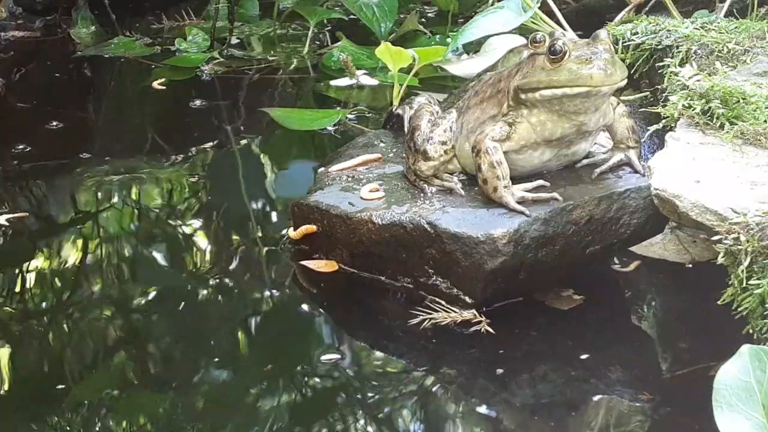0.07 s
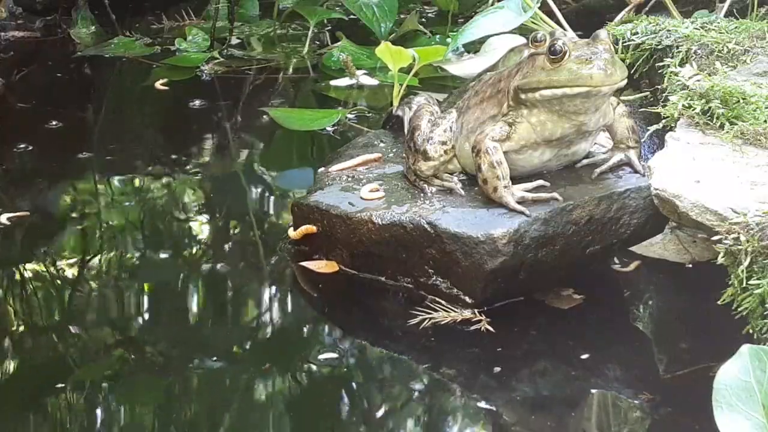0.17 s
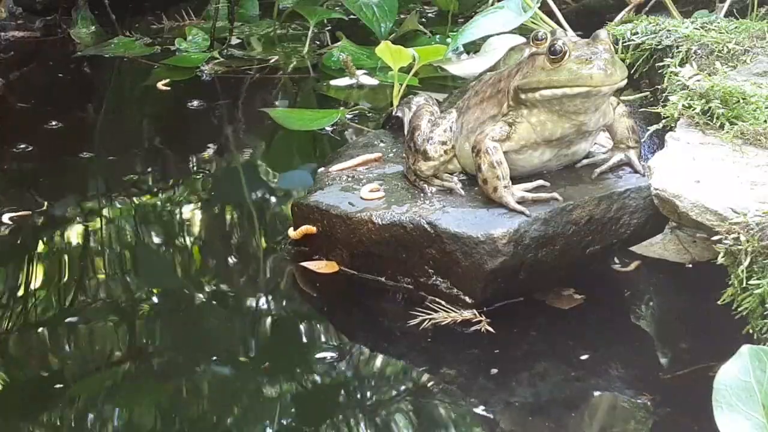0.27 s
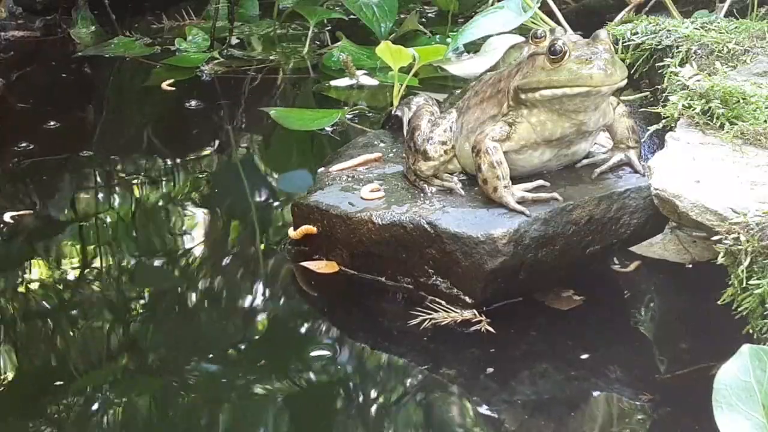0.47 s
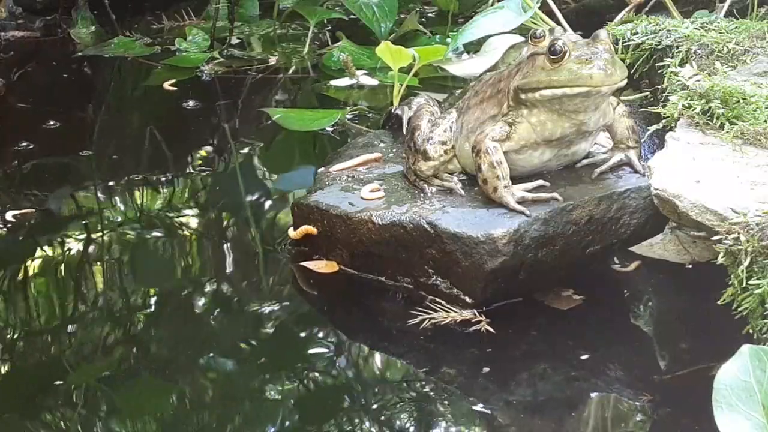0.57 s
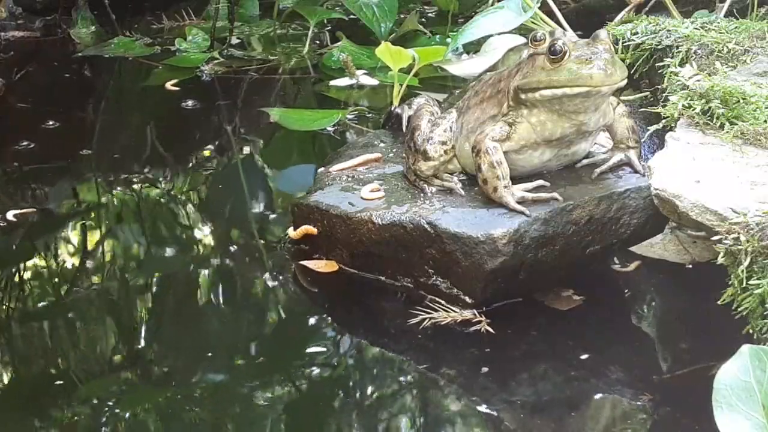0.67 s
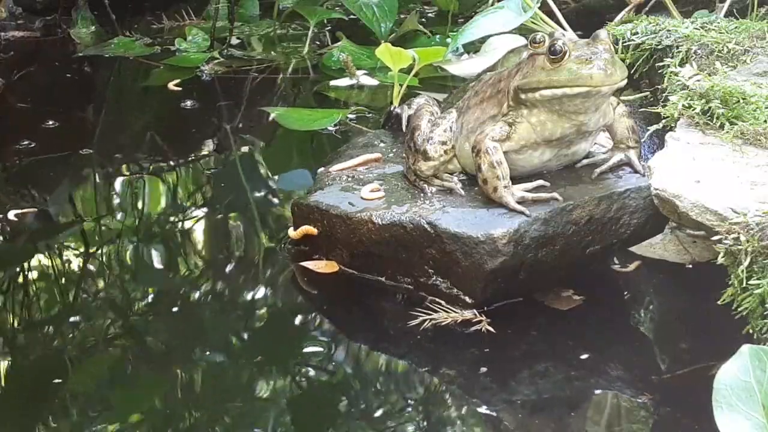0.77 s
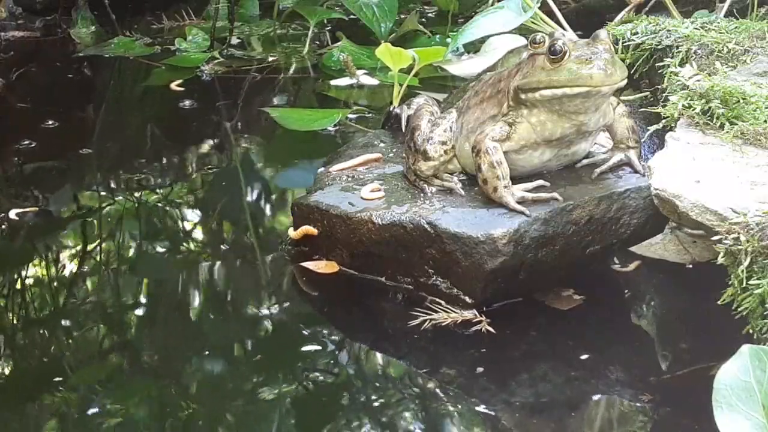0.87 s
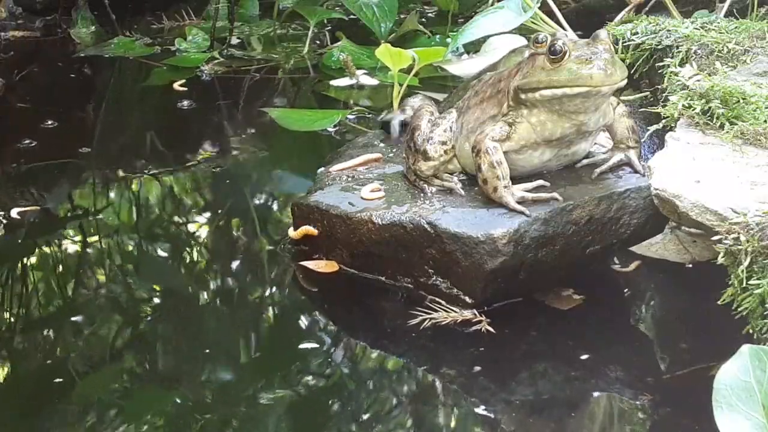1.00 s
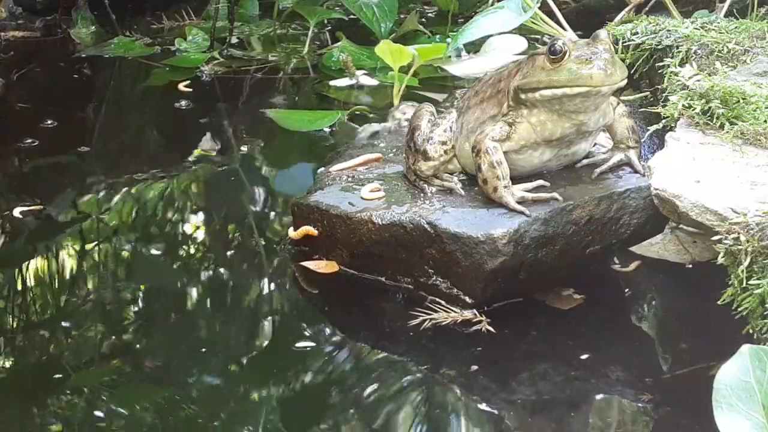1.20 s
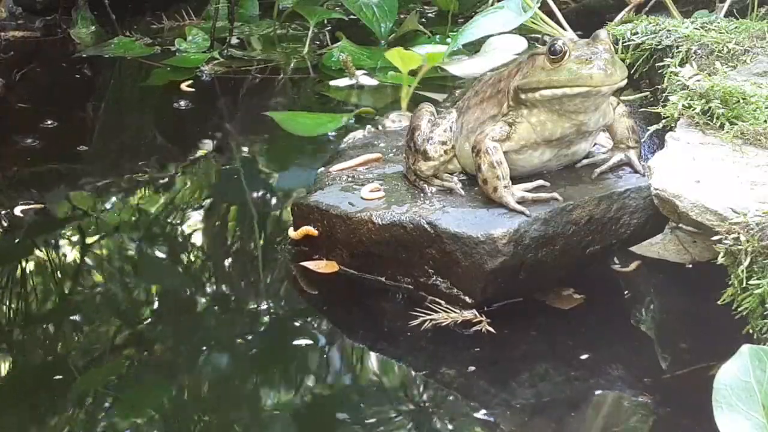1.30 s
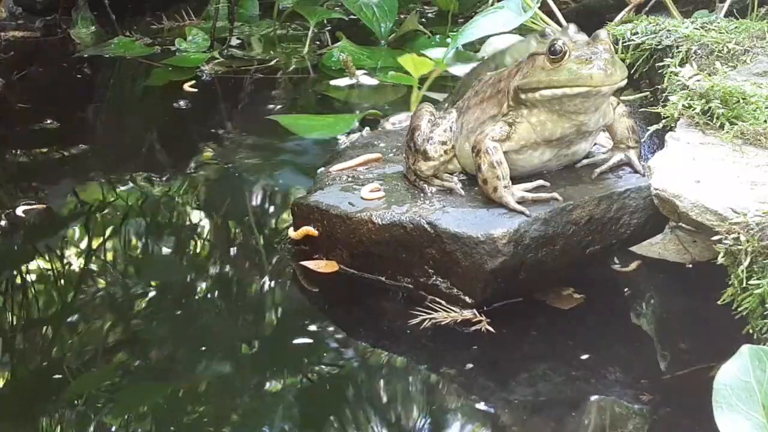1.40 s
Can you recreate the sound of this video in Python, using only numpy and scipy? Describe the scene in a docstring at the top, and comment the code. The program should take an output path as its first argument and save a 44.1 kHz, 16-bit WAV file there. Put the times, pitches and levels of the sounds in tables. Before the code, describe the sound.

A bullfrog gives one low bellow beside a quiet pond.

```python
"""Bullfrog on a pond rock

A little left of the stereo microphone, a bullfrog gives one low bellow: throat pulses that swell and
fade, limping in threes as a growl, then settling into a cleaner, lower note. A soft low hum leads in,
probably the sac filling; the banks answer briefly and a falling hum follows. Behind are a quiet
outdoor rush, a thin, distant trill, faint higher whirs and two tiny ticks."""
import sys
import numpy as np
from scipy import signal
from scipy.fft import rfft, irfft, next_fast_len
from scipy.io import wavfile
from scipy.ndimage import map_coordinates

SR = 44100
rng = np.random.default_rng(int(sys.argv[2]) if len(sys.argv) > 2 else 0)


def master(y):
    """Save y as 16-bit WAV."""
    cut = np.clip(np.atleast_2d(y).T, -1, 1)
    pcm = np.round(cut * 32767)  # scale
    wavfile.write(sys.argv[1], SR, pcm.astype(np.int16))


N = 63945

# likeness of the noise at the two sides of the microphone (frequency [Hz], correlation [0-1])
LIKENESS = [(60, 1), (300, 0.7), (900, 0.11), (1500, 0), (3000, 0), (15000, 0)]
# low rumble around the pond (frequency [Hz], relative level [dB])
RUMBLE_SPECTRUM = [(5, -59.5), (20, -38), (40, -13), (60, -2), (90, -1), (125, 0), (170, -6.5), (250, -5.5),
                   (400, -47.5), (800, -22), (4000, -95)]
# rush of the open air (frequency [Hz], relative level [dB])
AIR_SPECTRUM = [(20, -58), (100, -3), (300, -3.5), (600, -3.5), (900, 2), (1250, -2), (1900, -13.5),
                (3000, -21), (4200, -16.5), (5300, -26), (7500, -28.5), (10000, -30), (12000, -22.5),
                (15700, -24.5)]
# lean of rumble and rush (frequency [Hz], left boost and right cut [dB])
OUTDOOR_PAN = [(100, 1), (300, -0.5), (600, -.8), (1000, -3.1), (2500, 1.5), (6000, -1), (12000, -1.1)]
# the distant trill (time [s], whistle level [dB], hiss level [dB])
TRILL_LEVELS = [(0, -69, -66.5), (.2, -74, -88.5), (.29, -70, -71), (.36, -56, -58.5), (.4, -67, -59),
                (.443, -49, -63), (.48, -58.5, -57.5), (.59, -58.5, -60.5), (.645, -56, -60.5),
                (.74, -59.5, -59.5), (.83, -67.5, -63.5), (1, -67, -68), (1.1, -78.5, -66.5),
                (1.25, -76.5, -65.5), (1.45, -85, -69)]
# faint high whirs and, at 254 Hz, a soft low hum before the call, probably the sac filling
# (peak time [s], half-length [s], centre [Hz], half-width [Hz], level [dB])
WHIRS_AND_SAC_HUM = [(.04, .1, 7800, 221, -68), (0.069, 0.35, 2140, 28.8, -66.5),
                     (0.088, 0.072, 254, 21.2, -54), (0.255, 0.044, 5510, 540, -58.5),
                     (0.325, 0.097, 5620, 905, -58), (.01, .05, 6360, 800, -64.5),
                     (.58, 0.076, 8600, 90, -76.5), (.92, 0.17, 6200, 500, -75.5),
                     (1.36, .04, 1120, 463, -60)]
# beat of the frog's vocal cords (time [s], pulse rate [Hz])
PULSE_RATE = [(.1, 126.2), (.21, 119.8), (.3, 120.3), (.33, 119.1), (.39, 114.9), (.45, 112.5), (.5, 112),
              (.58, 110.3)]
# the growl (time [s], depth of the limp [0-1])
GROWL_DEPTH = [(.1, 1), (.27, 1), (.33, 0.5), (.365, 0.45), (.4, 0.14), (.55, 0.52)]
# effort of the bellow (time [s], level [dB])
EFFORT_LEVEL = [(.04, -59.5), (.11, -54), (.17, -43.5), (.245, -33), (.32, -26.5), (.38, -24), (.44, -30),
                (.528, -38), (.555, -46), (.58, -54), (.6, -53.5)]
# brightness of the voice (time [s], gain of the upper formant [dB])
BRIGHTNESS = [(.15, -33), (.22, -5), (.28, 4.5), (.335, 1.5), (.375, 0), (.41, 1.5), (.47, -5), (.55, -8.5)]
# throat and vocal sac while swelling (frequency [Hz], relative level [dB])
SAC_SWELLING = [(30, -85), (120, -44.5), (250, -14), (310, -6), (362, 1.5), (420, 0.5), (482, 5.5),
                (540, -1), (602, 5.5), (730, -2), (900, 3.5), (1000, -14.5), (1170, -12), (1340, -14),
                (1510, -4), (1700, -18), (1830, -31), (2350, -32.5), (3200, -56), (5000, -60.5)]
# throat and sac when taut (frequency [Hz], relative level [dB])
SAC_TAUT = [(30, -56), (120, -36), (240, -41), (350, -4), (470, 5), (590, 2), (700, -6), (810, -8.5),
            (930, 2), (1050, -39), (1150, -3.5), (1290, -21), (1420, -13.5), (1540, 2), (1640, -12),
            (1740, -14), (1850, -27), (2020, -28.5), (2200, -38.5), (2370, -23.5), (2560, -42.5),
            (2790, -23.5), (3050, -52), (5000, -69)]
# throat and sac while easing off (frequency [Hz], relative level [dB])
SAC_EASING = [(30, -49.5), (120, -36), (230, -25.5), (280, -45), (340, -9), (400, -15), (455, 1.5),
              (510, -6), (570, -7.5), (680, -8.5), (745, -16.5), (795, -18), (850, -15), (905, -5),
              (965, -27.5), (1020, -19.5), (1140, -14), (1360, -22), (1580, -16), (1700, -42), (1850, -35),
              (2000, -24), (2200, -62), (2380, -34), (2550, -51), (3200, -54), (5000, -64)]
# the frog's place, left of centre (frequency [Hz], left boost and right cut [dB])
ROCK_PAN = [(300, 1.63), (1000, 2.2), (2500, 1.7)]
# breathy part of the bellow (frequency [Hz], relative level [dB])
RASP_SPECTRUM = [(30, -52), (300, 2), (600, 6.5), (1500, -3.5), (2100, -14.5), (4000, -20.5), (5500, -14.5),
                 (7000, -19), (9000, -25.5), (15500, -28.5)]
# decay of the banks' answer (frequency [Hz], time to fall 60 dB [s])
BANK_DECAY = [(200, 0.089), (1000, .15), (3000, 0.17), (10000, 0.18)]
# strength of that answer at the microphone (frequency [Hz], gain [dB])
BANK_GAIN = [(200, -36), (500, -28), (1000, -5), (1600, -10.5), (2400, -4), (5000, 1)]
# the hum after the call (time [s], pitch [Hz], level [dB])
HUM_GLIDE = [(.53, 340, -88), (.6, 323.8, -57.5), (.645, 293.5, -48), (.7, 273.2, -57), (.74, 254, -49),
             (.78, 242, -59), (.85, 241, -100)]
# colour of the ticks (frequency [Hz], relative level [dB])
TICK_SPECTRUM = [(1000, -30), (4000, -3), (7500, 0.5), (11000, -13), (15500, 0)]
# the two ticks (time [s], level [dB])
TICK_ONSETS = [(1.346, -58.5), (1.378, -60)]

CREST_S = 0.3798  # the pulse at the peak of the frog's effort


def amp(db):
    """Decibels to gain."""
    return 10 ** (np.asarray(db) / 20)


def unit(x):
    """Scale to rms 1."""
    return x / np.sqrt(np.mean(x ** 2) + 1e-20)


def along(points, hz):
    """(Hz, value) points read on a log axis."""
    freqs, values = np.transpose(points)
    return np.interp(np.log(hz + 1), np.log(freqs + 1), values)


def clock():
    """Time of each sample in seconds."""
    return np.arange(N) / SR


def curves(rows):
    """One value per sample for each column after the time."""
    times, *columns = np.transpose(rows)
    return [np.interp(clock(), times, column) for column in columns]


def wobble(rate):
    """A smooth random curve, rate knots a second."""
    return map_coordinates(rng.standard_normal(N // 100), [clock() * rate + 2])


def filtered(x, response):
    """Pass x through a response given as a function of frequency."""
    size = 2 * next_fast_len(N)
    return irfft(rfft(x, size) * response(np.fft.rfftfreq(size, 1 / SR)), size)[..., :N]


def ringing(points, hz):
    """Minimum-phase response with the given (Hz, dB) shape: it rings only after a pulse."""
    cepstrum = irfft(np.log(amp(along(points, hz))))
    causal = np.concatenate([cepstrum[:1], 2 * cepstrum[1:len(cepstrum) // 2]])
    return np.exp(rfft(causal, len(cepstrum)))


def rush(gain):
    """Stereo noise of rms 1, alike in the bass and diffuse in the treble."""
    def mid_side(hz):
        angle = np.arccos(np.clip(along(LIKENESS, hz), -1, 1)) / 2
        return gain(hz) * np.array([np.cos(angle), np.sin(angle)])
    mid, side = filtered(rng.standard_normal((2, N)), mid_side)
    return unit(np.array([mid + side, mid - side]))


def narrow(centre_hz, half_width_hz):
    """Stereo noise in one resonance."""
    return rush(lambda hz: np.minimum(hz / centre_hz, 1) / (1 + ((hz - centre_hz) / half_width_hz) ** 2))


def outdoors(rumble_db=-56.5, air_db=-54.5):
    """All around the microphone, a low rumble under a steady, airy rush."""
    rumble = amp(rumble_db) * rush(lambda hz: amp(along(RUMBLE_SPECTRUM, hz)))
    air = amp(air_db + 0.36 * wobble(8.48)) * rush(lambda hz: amp(along(AIR_SPECTRUM, hz)))
    return filtered(rumble + air, lambda hz: amp(np.outer([1, -1], along(OUTDOOR_PAN, hz))))


def trill(flutter_db=2.5):
    """From far off, a thin, fluttering whistle in a band of hiss, perhaps an insect or a bird."""
    whistle_db, hiss_db = curves(TRILL_LEVELS)
    flutter = amp(flutter_db * wobble(79.46))
    whistle = unit(flutter * narrow(centre_hz=3964, half_width_hz=65))
    hiss = narrow(centre_hz=3960, half_width_hz=790)
    return amp(whistle_db) * whistle + amp(hiss_db) * hiss


def whirs_and_sac_hum():
    """Faint high whirs come and go; a soft low hum before the call is probably the sac filling."""
    return sum(amp(db) * np.exp(-((clock() - peak_s) / half_s) ** 2) * narrow(hz, half_hz)
               for peak_s, half_s, hz, half_hz, db in WHIRS_AND_SAC_HUM)


def cord_cycles():
    """Cycles of the vocal cords, counted from the crest of the call."""
    cycles = np.cumsum(curves(PULSE_RATE)[0]) / SR
    return cycles - np.interp(CREST_S, clock(), cycles)


def pulses(limp_s=0.00029, limp_size=0.033, jitter_s=0.00003, scatter_db=0.5):
    """One pulse per cycle of the vocal cords; in the growl they come early and late by turns."""
    cycle = np.arange(-40, 26)
    due_s = np.interp(cycle, cord_cycles(), clock())
    growl = np.interp(due_s, *np.transpose(GROWL_DEPTH))
    limp = 2 * np.pi * (0.32 * cycle + 0.471)  # one turn in about three pulses
    jitter, scatter = rng.standard_normal((len(cycle), 2)).T
    position = SR * (due_s + growl * (limp_s * np.cos(limp) + jitter_s * jitter))
    size = (1 + limp_size * growl * np.sin(limp)) * amp(scatter_db * scatter)
    taps = position.astype(int)[:, None] + np.arange(-7, 9)
    offset = taps - position[:, None]
    shape = np.sinc(offset) * np.sinc(offset / 8)  # lets a pulse fall between samples
    return np.bincount(np.clip(taps, 0, N - 1).ravel(), (size[:, None] * shape).ravel(), N)


def ramp(middle_s, length_s):
    """A straight rise from 0 to 1."""
    return np.clip((clock() - middle_s) / length_s + .5, 0, 1)


def bellow(upper_formant_edge_hz=1290):
    """The pulses ring the frog's throat, whose resonances shift as the sac tightens and eases."""
    train = pulses()
    (effort_db,), (bright_db,) = curves(EFFORT_LEVEL), curves(BRIGHTNESS)
    call_s = train.sum() / np.mean(curves(PULSE_RATE))
    scale = np.sqrt(call_s * SR / N)  # rms near 1 while the call lasts
    swelling, taut, easing = [scale * unit(filtered(train, lambda hz: ringing(sac, hz)))
                              for sac in (SAC_SWELLING, SAC_TAUT, SAC_EASING)]
    tighten = ramp(middle_s=0.3006, length_s=0.044)
    ease = ramp(middle_s=0.375, length_s=0.11)
    inflated = (1 - ease) * taut + ease * easing
    voice = amp(effort_db) * ((1 - tighten) * swelling + tighten * inflated)
    upper = filtered(voice, lambda hz: 1 - 1 / (1 + (hz / upper_formant_edge_hz) ** 12))
    return voice + (amp(bright_db) - 1) * upper


def rasp(below_crest_db=20.5, db_per_effort_db=0.56, puff_depth=0.18):
    """A faint, lasting hiss rises with the effort of the bellow and puffs at the pulse rate."""
    effort_db, = curves(EFFORT_LEVEL)
    crest_db = effort_db.max()
    level_db = crest_db - below_crest_db + db_per_effort_db * (effort_db - crest_db)
    puffs = 1 + puff_depth * np.sin(2 * np.pi * cord_cycles())
    return amp(level_db) * puffs * rush(lambda hz: amp(along(RASP_SPECTRUM, hz)))


def banks(call):
    """Rocks and plants around the pond send a short, diffuse answer back to the microphone."""
    hz, seconds, noise = signal.stft(rng.standard_normal((2, SR // 2)), SR, nperseg=256)
    decay = amp(-60 * seconds / along(BANK_DECAY, hz)[:, None])
    tail = signal.istft(noise * decay, SR, nperseg=256)[1]
    answer = signal.fftconvolve(call[None], tail / np.linalg.norm(tail[0]), axes=1)[:, :N]
    return filtered(answer, lambda hz: amp(along(BANK_GAIN, hz)))


def hum():
    """From the same rock, a soft tone sinks after the call, probably the sac emptying."""
    hz, db = curves(HUM_GLIDE)
    level = amp(db + 0.5 * wobble(47.3))
    wavering_hz = hz * (1 + 0.021 * wobble(62.2))
    return np.sqrt(2) * level * np.sin(2 * np.pi * np.cumsum(wavering_hz) / SR)


def ticks(t60_s=0.099):
    """Two tiny, bright ticks in the background that die at once."""
    level = sum((clock() > onset_s) * amp(db - 60 * np.abs(clock() - onset_s) / t60_s)
                for onset_s, db in TICK_ONSETS)
    return level * rush(lambda hz: amp(along(TICK_SPECTRUM, hz)))


def scene(left_lead_s=0.00008):
    """The pond at the microphone: the frog reaches the left side first, and a little louder."""
    frog = bellow() + hum()
    sides = np.array([[1], [-1]])
    direct = filtered(frog, lambda hz: amp(sides * along(ROCK_PAN, hz))
                      * np.exp(1j * np.pi * hz * left_lead_s * sides))
    return outdoors() + trill() + whirs_and_sac_hum() + direct + rasp() + banks(frog) + ticks()


def record(dry, top_hz=15800):
    """The microphone passes nothing above its band limit."""
    return filtered(dry, lambda hz: hz < top_hz)


dry = scene()
out = record(dry)
master(out)
```